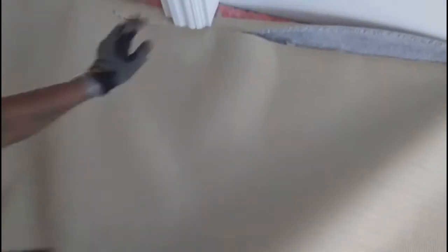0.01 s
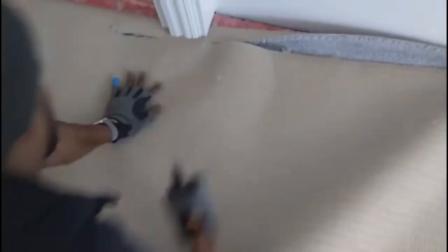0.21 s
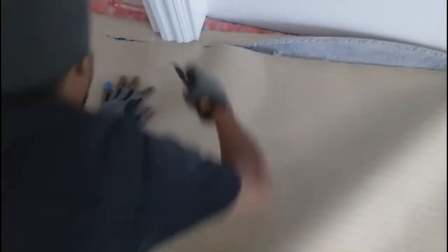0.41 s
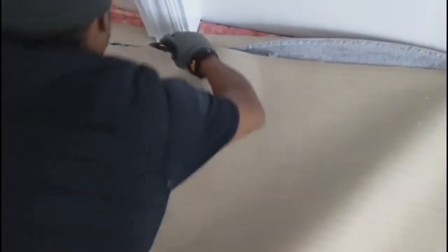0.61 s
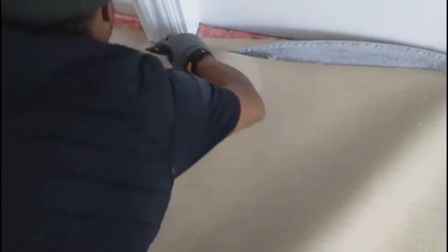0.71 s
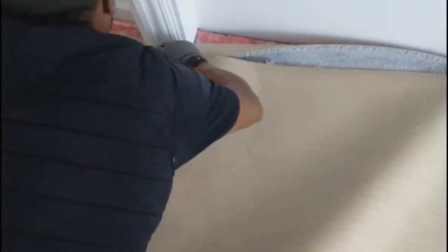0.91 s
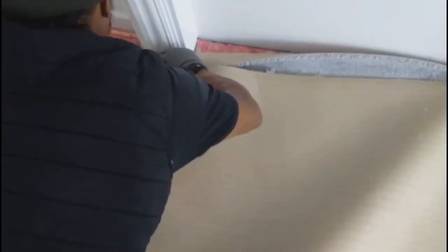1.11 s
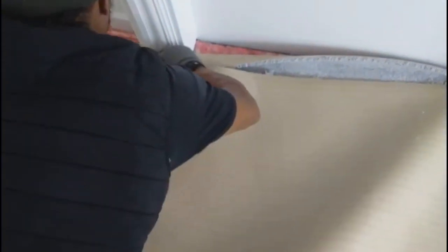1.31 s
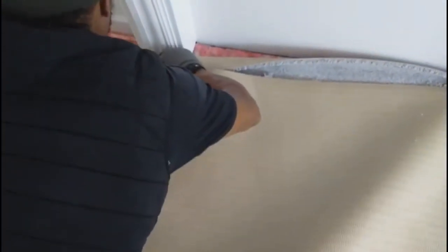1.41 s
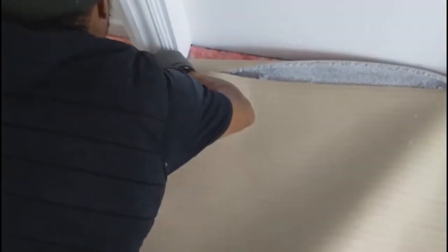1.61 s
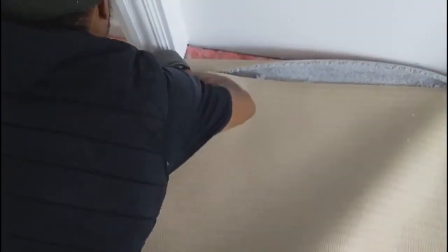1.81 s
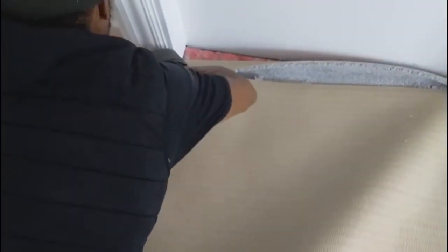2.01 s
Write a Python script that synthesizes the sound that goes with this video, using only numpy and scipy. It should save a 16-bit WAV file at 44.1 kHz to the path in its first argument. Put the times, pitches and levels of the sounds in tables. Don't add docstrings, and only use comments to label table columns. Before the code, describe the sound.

A single sharp hand slap on carpet knocks the hollow floor and booms off bare walls; near quiet follows, with faint rustling, then a burst of scraping, soft thumps and blade clicks at the end, heard close.

```python
import sys
import numpy as np
from scipy import signal
from scipy.fft import rfft, irfft
from scipy.io import wavfile

SR = 44100
rng = np.random.default_rng(int(sys.argv[2]) if len(sys.argv) > 2 else 0)


def log_audio(samples):
    frames = np.atleast_2d(samples).T
    limited = np.clip(frames, -1, 1)
    pcm = np.round(limited * 32767).astype(np.int16)
    wavfile.write(sys.argv[1], SR, pcm)


def invert_db(level):
    return 10 ** (np.asarray(level, dtype=float) / 20)


N = 92610


def rms_one(x):
    return x / np.sqrt(np.mean(x ** 2) + 1e-20)


def in_time(rows):
    s, db = np.transpose(rows)
    return invert_db(np.interp(np.arange(N) / SR, s, db))


def at_hz(points, hz):
    table_hz, value = np.transpose(points)
    return np.interp(np.log(hz), np.log(table_hz), value)


def colour(x, spectrum):
    hz = np.arange(len(x) // 2 + 1) * SR / len(x) + 1
    low_end = (spectrum[0][0] / 2, spectrum[0][1] - 30)
    return irfft(rfft(x) * invert_db(at_hz([low_end] + list(spectrum), hz)), len(x))


def noise(spectrum):
    return rms_one(colour(rng.standard_normal(N), spectrum))


def drift(rate_hz):
    r = np.exp(-2 * np.pi * rate_hz / SR)
    return rms_one(signal.lfilter([1], [1, -2 * r, r * r], rng.standard_normal(N + SR))[SR:])


def spikes(s, gains):
    out = np.full(N, 1e-18)
    place = np.clip((np.asarray(s) * SR).astype(int), 0, N - 1)
    np.add.at(out, place, gains)
    return out


def strike(s, db, modes, spread_db=3.0):
    out = 0
    own = rng.normal(0, 1, (len(s), len(modes)))
    for k, (hz, level_db, t60) in enumerate(modes):
        r = invert_db(-60 / (t60 * SR))
        w = 2 * np.pi * hz / SR
        blows = spikes(s, invert_db(db + level_db + spread_db * own[:, k]))
        sign = (-1) ** k
        out = out + signal.lfilter([0, sign * np.sin(w)], [1, -2 * r * np.cos(w), r * r], blows)
    return out


def fibres(spectrum, per_s, size_db, patchy_db):
    caught = rng.random(N) < per_s / SR
    size = invert_db(size_db * np.minimum(rng.exponential(1, N), 4))
    grains = caught * size * rng.standard_normal(N)
    return rms_one(colour(grains * invert_db(patchy_db * drift(60)), spectrum))


def soften(x, hz):
    return signal.sosfilt(signal.butter(2, hz, fs=SR, output="sos"), x)


def swell_and_ring(rows):
    t, out = np.arange(N) / SR, 0
    for s, hz, db, t60 in rows:
        age = np.maximum(t - s, 0)
        swell = 1 - np.exp(-age / .007)
        out = out + invert_db(db - 60 * age / t60) * swell * np.sin(2 * np.pi * hz * age)
    return out


# pitch_hz, t60_s
ROOM_T60 = [(80, 0.63), (300, 0.49), (1000, 0.54), (3000, 0.42), (6000, 0.42), (11000, 0.28)]


def diffuse(spectrum):
    t, tail = np.arange(SR) / SR, 0
    edges = 50 * 2 ** np.arange(0, 8.6, .5)
    white = rng.standard_normal((2, SR))
    for k, (low, high) in enumerate(zip(edges, edges[1:])):
        hz = np.sqrt(low * high)
        sos = signal.butter(2, [low, high], "band", fs=SR, output="sos")
        fade = invert_db(at_hz(spectrum, hz) - 60 * t / at_hz(ROOM_T60, hz))
        tail = tail + signal.sosfilt(sos, white[k % 2]) * fade
    tail = tail * (1 - np.exp(-t / .0058))
    return tail / np.sqrt(np.sum(tail ** 2))


def room(x):
    return invert_db(4) * signal.fftconvolve(x, diffuse([(100, 0), (10000, 0)]))[:N]


# pitch_hz, level_db
HUSH = [(24, -47), (40, -13.5), (114, -1), (310, -15.5), (384, -16.5), (970, -28), (1390, -25), (6210, -20),
        (11800, -27.5), (15300, -55.5), (22000, -120)]


def hush():
    return invert_db(-70) * noise(HUSH)


# start_s, level_db
HUM_SWELL = [(0, -75), (.1, -62.5), (.2, -68), (.6, -71), (.8, -64.5), (.95, -68.5), (1.03, -75),
             (1.1, -68), (1.2, -77), (1.3, -70), (1.33, -65.5), (1.44, -65.5), (1.5, -74), (1.66, -67),
             (1.74, -62), (1.8, -65.5), (1.85, -71), (2.1, -71)]


def hum():
    pitch_hz = 99 + 5.0 * drift(8)
    rough = invert_db(3.5 * drift(12))
    return in_time(HUM_SWELL) * rough * np.sin(2 * np.pi * np.cumsum(pitch_hz) / SR)


# start_s, pitch_hz, level_db
WHISTLE = [(1.37, 4950, -85), (1.395, 4900, -66), (1.425, 4900, -65), (1.45, 5300, -76), (1.485, 5900, -57),
           (1.515, 5850, -58), (1.56, 5900, -76), (1.65, 5300, -80), (1.69, 5400, -73), (1.718, 5300, -78),
           (1.726, 4600, -71), (1.87, 4500, -73), (1.9, 4500, -85)]


def whistle():
    s, hz, db = np.transpose(WHISTLE)
    t, width_hz = np.arange(N) / SR, 330
    phase = 2 * np.pi * np.cumsum(np.interp(t, s, hz)) / SR
    band = drift(width_hz) * np.cos(phase) + drift(width_hz) * np.sin(phase)
    return invert_db(np.interp(t, s, db)) * band


# start_s, level_db
SLEEVE = [(0, -85), (.5, -72.5), (.76, -68.5), (.85, -87), (1.4, -81), (1.5, -73), (1.68, -66), (1.8, -65),
          (1.9, -64.5), (2.1, -55)]
# pitch_hz, level_db
CLOTH = [(3500, -7), (7000, -1.5), (10500, -1.5), (12000, -4.5)]


def sleeve():
    return in_time(SLEEVE) * fibres(CLOTH, per_s=21000, size_db=1.0, patchy_db=1.0)


# start_s, level_db
BRUSH = [(0, -64.5), (.2, -69), (.55, -64), (.74, -85), (.83, -70), (.89, -61.5), (.96, -68.5),
         (1.04, -84.5), (1.38, -74.5), (1.465, -51), (1.474, -51), (1.53, -61), (1.62, -71), (1.715, -72),
         (1.724, -64.5), (1.86, -69), (2.03, -55), (2.1, -74)]
# pitch_hz, level_db
PILE = [(3000, -22), (4000, -9), (5000, -2), (5800, 0), (6800, -7), (8500, -10), (9100, -17), (11600, -12)]


def glove():
    return in_time(BRUSH) * fibres(PILE, per_s=23000, size_db=1.6, patchy_db=1.5)


# start_s, level_db
DRAG = [(0, -55.5), (.12, -61.5), (.6, -62), (.8, -65.5), (.88, -80), (1.3, -77), (1.4, -71.5), (1.42, -57),
        (1.5, -58), (1.62, -73), (1.86, -72.5), (1.92, -59.5), (1.934, -50.5), (1.97, -48.5),
        (2.015, -48.5), (2.03, -39), (2.055, -44.5), (2.1, -50.5)]
# pitch_hz, level_db
BACKING = [(600, -23.5), (820, -13), (960, -2.5), (1400, -3), (2000, -6), (3500, -5), (6500, -15),
           (10000, -21.5)]


def drag():
    return in_time(DRAG) * fibres(BACKING, per_s=10000, size_db=0.84, patchy_db=0.36)


# start_s, level_db
FOLD = [(0, -67), (.2, -80.5), (.55, -61.5), (.8, -68), (.88, -81), (1.29, -85), (1.33, -76), (1.45, -80.5),
        (1.49, -68), (1.63, -78.5), (1.66, -74.5), (1.8, -81), (1.86, -81), (1.885, -58), (1.94, -46),
        (2.015, -52), (2.045, -38.5), (2.1, -55)]
# pitch_hz, level_db
FOLD_LOW = [(220, -9.5), (300, -2), (450, -2), (650, -4), (900, -6.5), (1300, -27)]


def fold():
    return in_time(FOLD) * fibres(FOLD_LOW, per_s=1200, size_db=0.5, patchy_db=2.0)


# start_s, peak_db, pitch_hz
SNAPS = [(.72, -53, 8000), (1.4245, -48, 4000), (1.4275, -50, 3200), (1.447, -50, 1300),
         (1.4705, -40, 6400), (1.472, -36, 6000), (1.4735, -44, 8000), (1.479, -46, 5200),
         (1.492, -47, 2300), (1.495, -50, 1150), (1.7215, -52, 4500), (1.7225, -55, 3200)]


def snaps():
    out = 0
    for s, db, hz in SNAPS:
        modes = [(hz * step, 0, 29 / hz) for step in (.8, 1, 1.3)]
        out = out + strike([s], db - 6, modes)
    return out


# start_s, pitch_hz, level_db, t60_s
BUMPS = [(1.302, 450, -62, .14), (1.318, 300, -59, .1), (1.362, 300, -60, .1), (1.465, 440, -63, .08),
         (1.49, 540, -63, .08), (1.638, 440, -65, .12), (1.68, 300, -64, .15), (1.884, 300, -49, .1),
         (1.892, 560, -54, .1), (1.96, 300, -47, .2)]


def bumps():
    return swell_and_ring(BUMPS)


# start_s, peak_db, pitch_hz
THUMPS = [(1.084, -51.5, 131), (1.108, -58, 132.9), (1.126, -56, 150), (1.311, -58.5, 108),
          (1.474, -57, 134.2), (1.51, -67, 175), (1.546, -58, 129), (1.593, -59.5, 170.2),
          (1.647, -53, 148), (1.72, -60, 169), (1.879, -44, 133), (1.886, -35.5, 143.7),
          (1.904, -39.5, 156), (1.923, -40, 145), (1.948, -49, 130), (1.976, -42, 157), (2.04, -39, 172),
          (2.084, -44, 167)]
# multiple_of_pitch, level_db, cycles_to_die
PADDED = [(1, 2, 8.8), (1.3, -4.5, 11.2), (2.2, -10, 14.7), (3.1, -11.5, 17)]


def thumps():
    out = 0
    for s, db, hz in THUMPS:
        modes = [(hz * step, level_db, cycles / (hz * step)) for step, level_db, cycles in PADDED]
        out = out + strike([s], db, modes, spread_db=1.5)
    return soften(out, 343)


# start_s, peak_db, low_body_db
CLICKS = [(1.1052, -53.5, -35), (1.8767, -43, -10), (1.8853, -41, -6.5), (1.9289, -35, 2),
          (1.9336, -36.5, -4.5), (1.9572, -45, 7), (1.9643, -34.5, -2.5), (2.013, -41, -3),
          (2.0233, -34, 2), (2.0285, -29.5, -2.5), (2.0325, -31, -23), (2.046, -41, 3)]
# pitch_hz, level_db, t60_s
BLADE_LOW = [(1850, -2, .014), (2370, 0, .016), (2700, -3, .014), (3450, -6, .014), (4250, -9, .012)]
# pitch_hz, level_db, t60_s
BLADE_HIGH = [(5200, -8, .01), (6180, -1, .015), (5800, -7, .012), (7700, -6, .012), (8500, -11, .008)]


def blade():
    s, db, low_db = np.transpose(CLICKS)
    steps = rng.uniform(0.64, 1.2, (len(s), 3)).cumsum(axis=1) - 1
    s = (s[:, None] + .0016 * steps).ravel()
    db, low_db = np.repeat(db, 3), np.repeat(low_db, 3)
    return strike(s, db - 11, BLADE_HIGH) + strike(s, db + low_db - 9, BLADE_LOW)


# start_s, level_db
SWING = [
    (0, -61),
    (.09, -65),
    (.22, -68),
    (.24, -94.5),
]
# pitch_hz, level_db
FLAP = [(450, -13.5), (600, 1), (900, 0), (1150, -17.5)]


def swing():
    return in_time(SWING) * fibres(FLAP, per_s=2000, size_db=1.0, patchy_db=2.5)


SLAP_AIR_S = .2345
# pitch_hz, level_db, t60_s
AIR = [(80, -32, .7), (96.5, -19, .52), (112, -25, .4), (128, -22, .15), (150, -21, .15), (176, -18, .12),
       (195, -27, .25)]
# pitch_hz, level_db, t60_s
SKIRTING = [(711, -26, .25), (803, -27, .16), (836, -24, .2), (886, -29, .3)]


def air_and_skirting():
    return sum(strike([SLAP_AIR_S], 2.5, [mode], spread_db=0.5) for mode in AIR + SKIRTING)


# start_s, pitch_hz, level_db, t60_s
RETURNS = [(.244, 368, -22, .08), (.25, 575, -25, .1), (.229, 830, -17, .06), (.266, 810, -27, .08),
           (.272, 455, -17, .13), (.285, 930, -30, .08), (.295, 125, -21, .1), (.325, 170, -26, .2),
           (.33, 550, -31, .15), (.35, 870, -37, .2), (.37, 455, -31, .15), (.375, 380, -33, .15),
           (.4, 220, -35, .15), (.44, 880, -44, .1), (.465, 430, -41, .14), (.485, 110, -39, .1),
           (.54, 110, -46, .1), (.55, 450, -52, .1)]


def returns():
    return swell_and_ring(RETURNS)


# pitch_hz, level_db
SLAP_TAIL = [(110, -3), (180, -3), (300, -11), (450, -1.5), (850, -15.5), (1100, -20), (4000, -21),
             (11500, -31.5)]


def slap_tail():
    return signal.fftconvolve(spikes([SLAP_AIR_S], invert_db(15)), diffuse(SLAP_TAIL))[:N]


# start_s, crack_db, boards_db
SLAP = [
    (.2280, -16, -27),
    (0.2313, -17.5, -32.5),
    (.2342, -6.5, -19),
    (0.2373, -20, -19),
    (.2400, -21, -23.5),
    (.2500, -27.5, -22.5),
]
# pitch_hz, level_db (per Hz)
SLAP_CRACK = [(530, -24), (900, -9), (1340, -16), (2850, -13.5), (4360, -9.5), (4850, -15.5), (6200, -19.5),
              (11500, -27.5), (15000, -53), (22000, -120)]
# pitch_hz, level_db, t60_s
BOARDS = [(235.3, -9.5, 0.09), (275, -11.5, .08), (365, -0.5, 0.07), (410, -4, 0.055), (459, -9, 0.2),
          (497, -7, .08), (564, -9, 0.05), (699.3, -5, 0.041), (746, -6.5, 0.057), (750, -5.5, 0.079),
          (960, -8.5, 0.03)]


def slap():
    s, crack_db, board_db = np.transpose(SLAP)
    t60_s, rise_s = 0.019, .0006
    fade = signal.lfilter([1], [1, -invert_db(-60 / (t60_s * SR))], spikes(s, invert_db(crack_db)))
    rise = np.exp(-1 / (rise_s * SR))
    fade = signal.lfilter([1 - rise], [1, -rise], fade)
    crack = fade * noise(SLAP_CRACK) / 2
    return crack + soften(strike(s, board_db, BOARDS, spread_db=3.5), 2380)


def scene():
    soft, clicks = thumps(), blade() + snaps()
    wet = room(invert_db(-10) * soft + invert_db(-12) * clicks)
    background = hush() + hum()
    carpet = sleeve() + glove() + drag() + fold() + swing() + whistle() + bumps()
    boom = air_and_skirting() + returns() + slap_tail()
    return (background + carpet + soft + clicks + wet + boom + slap())[None]


def low_pass(x):
    return signal.sosfilt(signal.butter(12, 12270, fs=SR, output="sos"), x)


def record(dry):
    x = signal.sosfilt(signal.butter(6, 67, "high", fs=SR, output="sos"), dry)
    x = signal.sosfilt(signal.cheby2(16, 70, 12390, fs=SR, output="sos"), x)
    return low_pass(x)


dry = scene()
out = record(dry)
log_audio(out)
```